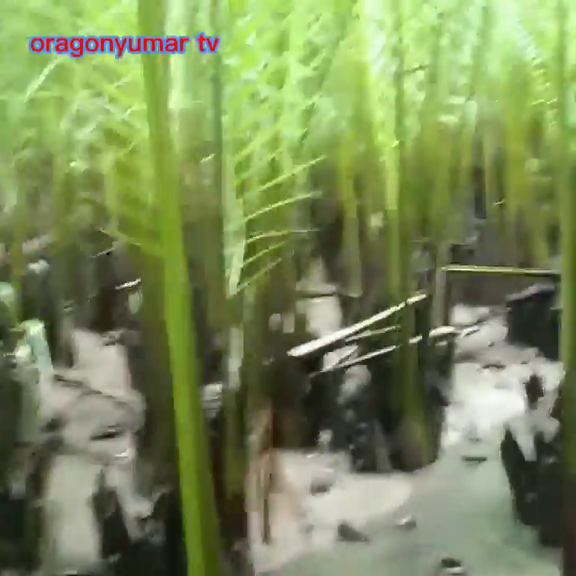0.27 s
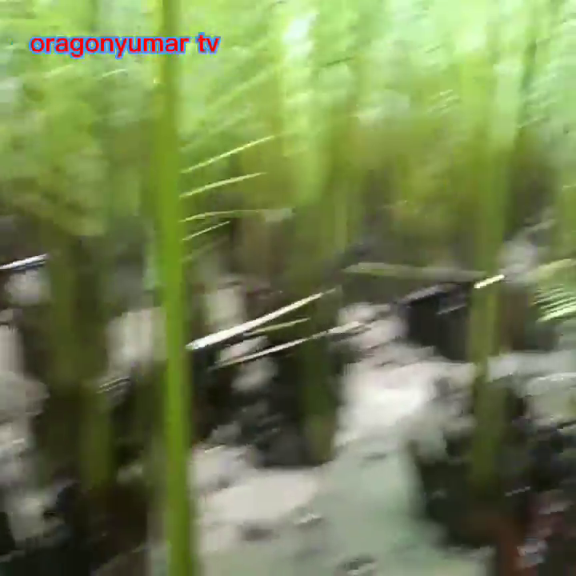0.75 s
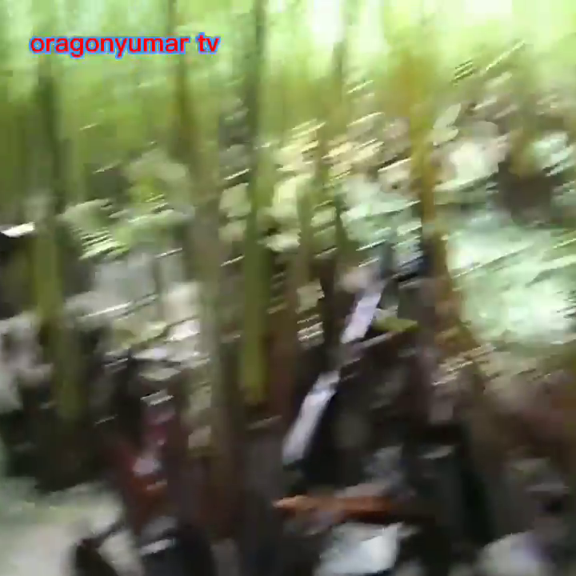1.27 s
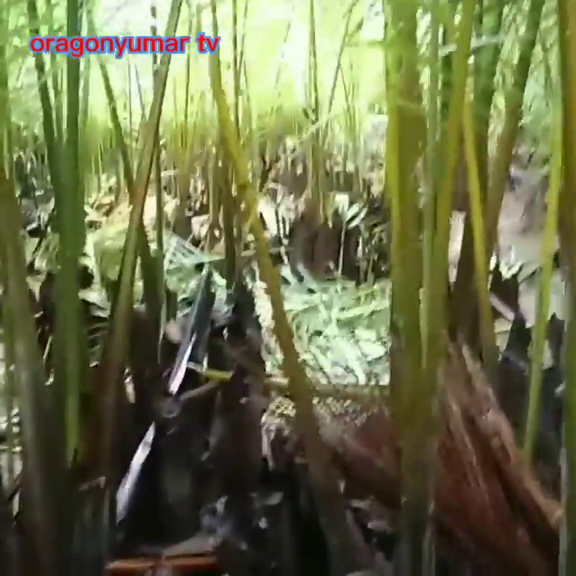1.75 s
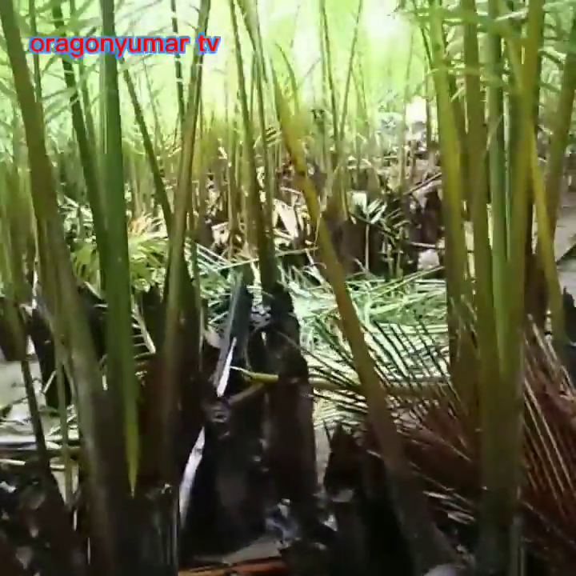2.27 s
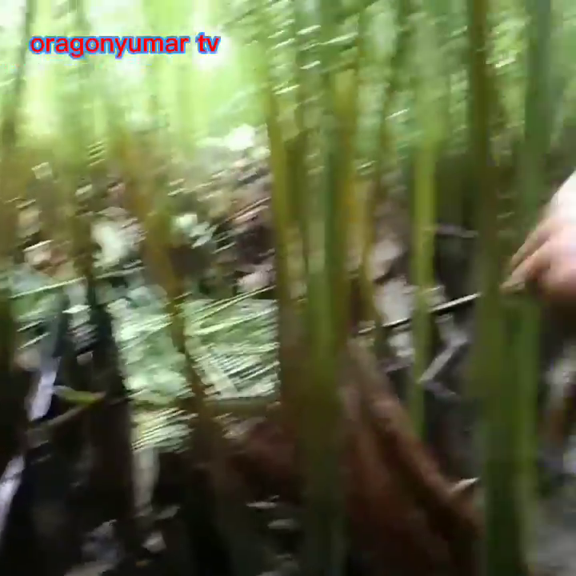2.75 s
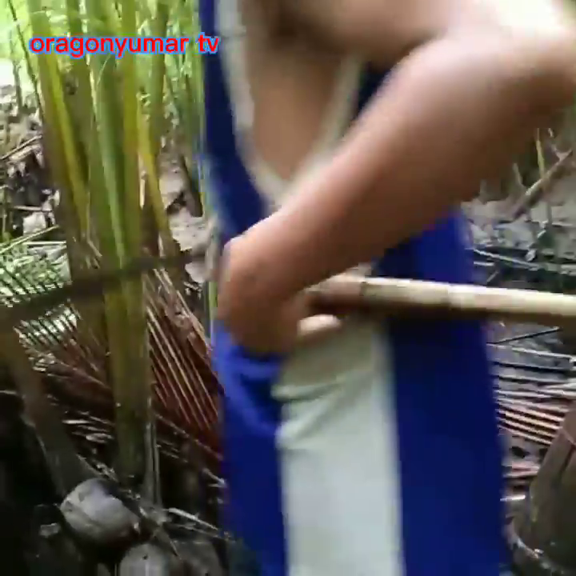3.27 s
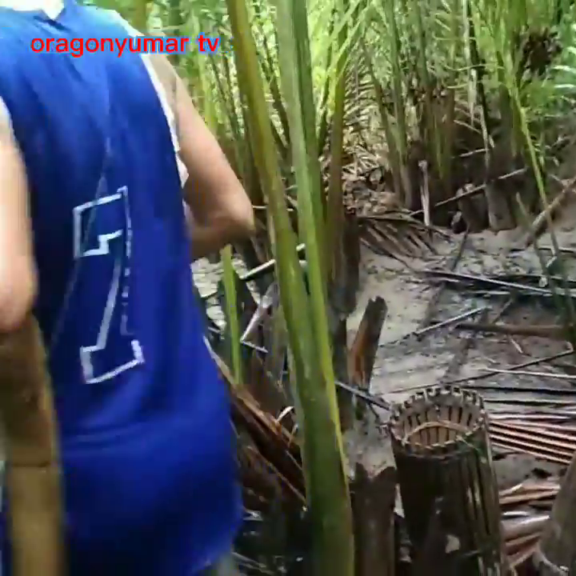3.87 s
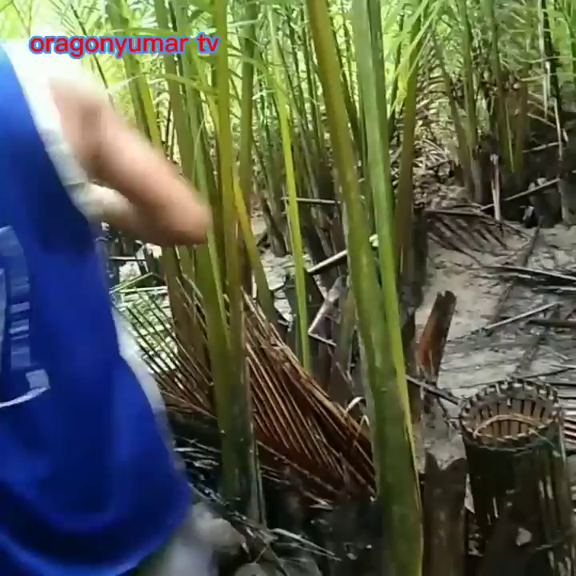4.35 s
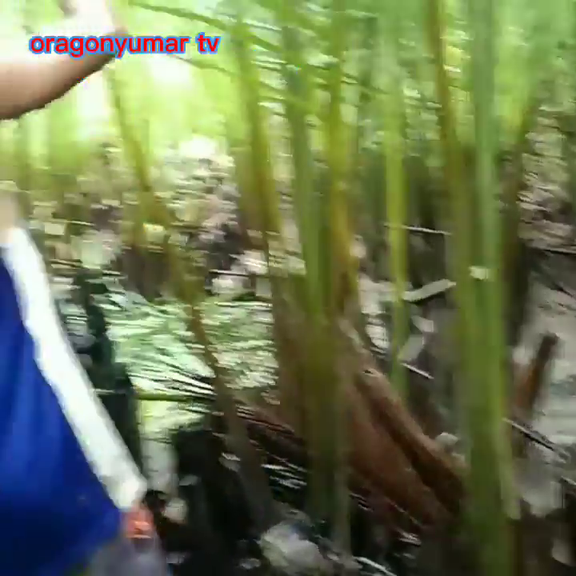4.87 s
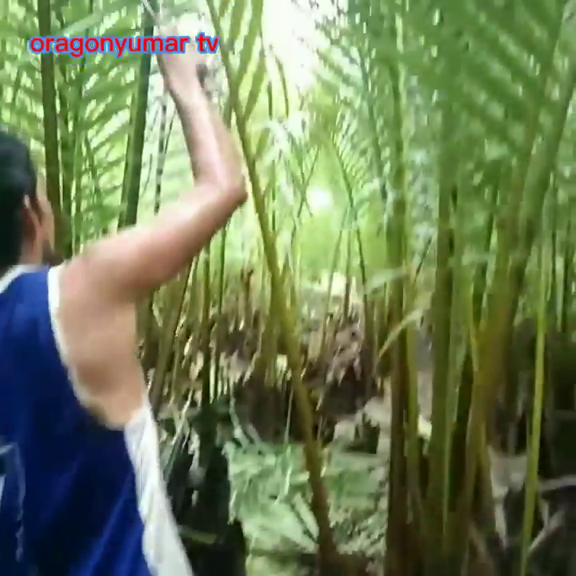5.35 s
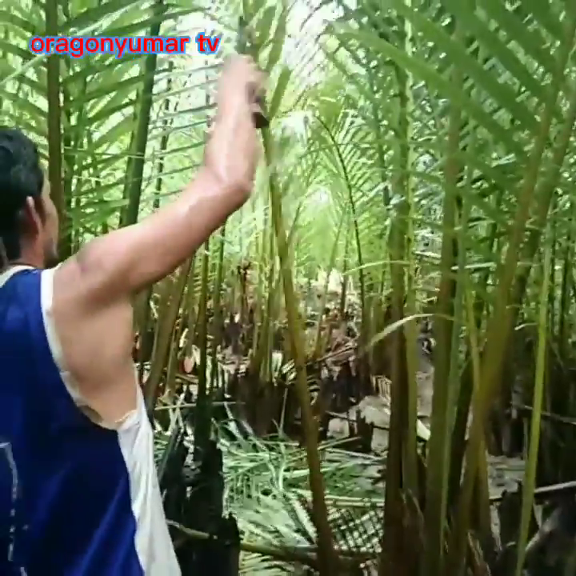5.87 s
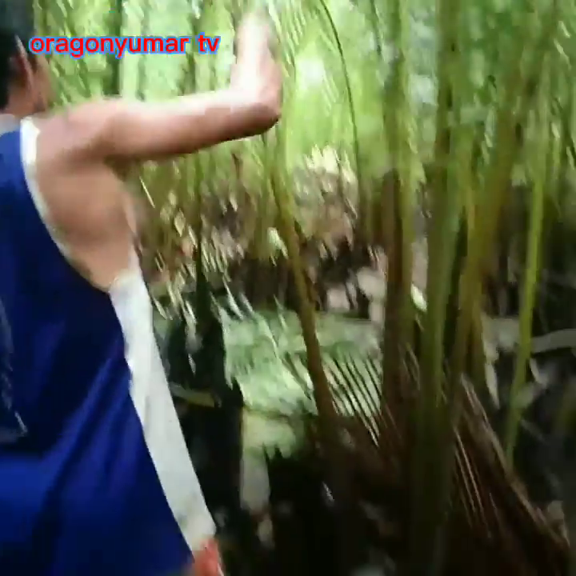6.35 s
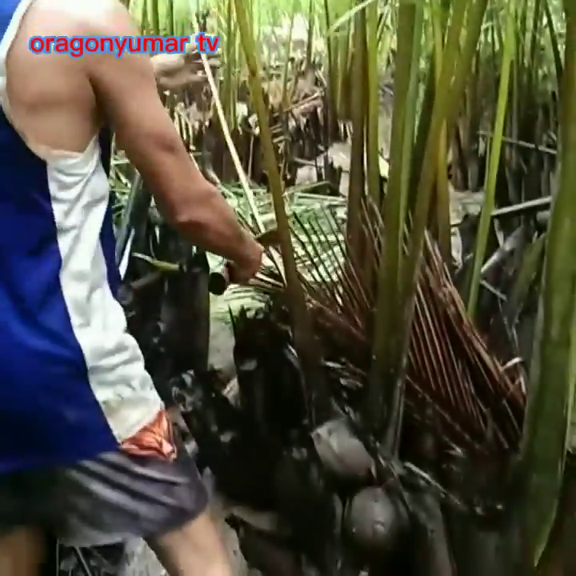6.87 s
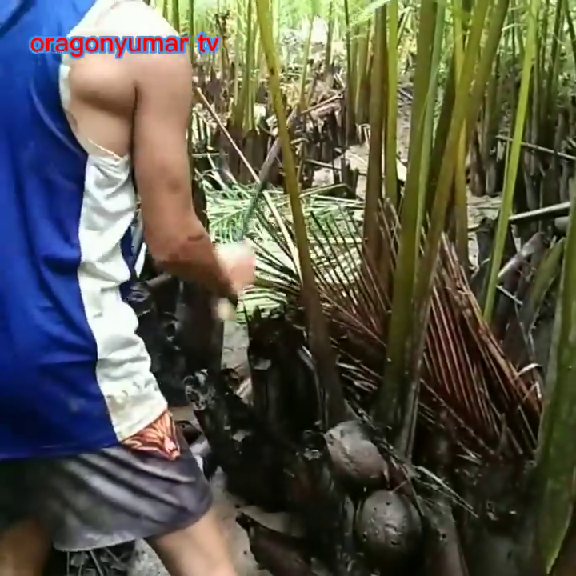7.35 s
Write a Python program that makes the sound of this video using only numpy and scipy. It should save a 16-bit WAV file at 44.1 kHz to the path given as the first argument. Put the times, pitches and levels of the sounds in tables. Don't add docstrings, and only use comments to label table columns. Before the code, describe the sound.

Dry palm fronds rustle, crackle and snap in irregular bursts, with a brief squeaky hand slide and the loudest, harshest pulls near the end.

```python
import sys
import numpy as np
from scipy import signal
from scipy.io import wavfile
from scipy.ndimage import uniform_filter1d

SR = 44100
rng = np.random.default_rng(int(sys.argv[2]) if len(sys.argv) > 2 else 0)


def invert_db(level):
    return 10 ** (np.asarray(level, dtype=float) / 20)


def int16_out(signal):
    q = np.round(np.clip(np.atleast_2d(signal).T, -1, 1) * 32767)
    wavfile.write(sys.argv[1], SR, q.astype(np.int16))


N = 335601


def rms_one(x):
    return x / np.sqrt(np.mean(x ** 2) + 1e-20)


def in_time(rows):
    s, *columns = np.transpose(rows)
    return [np.interp(np.arange(N) / SR, s, column) for column in columns]


def at_hz(points, hz):
    point_hz, point_db = np.transpose(points)
    return np.interp(np.log(hz), np.log(point_hz), point_db)


def drift(rate_hz):
    step = 40
    r = np.exp(-2 * step * np.pi * rate_hz / SR)
    white = rng.standard_normal(N // step + 2002)
    slow = signal.lfilter([1], [1, -2 * r, r * r], white)[2000:]
    return np.interp(np.arange(N) / step, np.arange(len(slow)), rms_one(slow))


def filtered(x, order, hz, kind):
    return signal.sosfilt(signal.butter(order, hz, kind, fs=SR, output="sos"), x)


def resonate(x, hz, width_hz):
    r = np.exp(-np.pi * width_hz / SR)
    poles = [1, -2 * r * np.cos(2 * np.pi * hz / SR), r * r]
    return signal.lfilter([(1 - r * r) / 2, 0, (r * r - 1) / 2], poles, x)


def add(out, at, sound):
    out[at:at + len(sound)] += sound[:N - at]


# (time [s], level [dB])
RUMBLE_GUSTS = [
    (0, -56),
    (.5, -52.5),
    (1.2, -57),
    (2.5, -51.5),
    (4.0, -54),
    (4.8, -51.5),
    (5.3, -54),
    (7.3, -51),
    (7.61, -42),
]


def rumble():
    low = filtered(rng.standard_normal(N), 2, [65, 160], "band")
    lumpy = rms_one(low * invert_db(0.89 * drift(6)))
    return invert_db(in_time(RUMBLE_GUSTS)[0] - 1.0) * lumpy


# (frequency [Hz], density [dB per Hz])
FOLIAGE_SPECTRUM = [(120, -41), (200, -4), (631, -4), (1240, -2.5), (2460, 4), (3270, -2.5), (4170, -1),
                    (4920, -0.5), (6460, -9.5), (6860, -1), (7400, -24), (9620, -42.5), (16300, -120)]


def foliage():
    level_db = -38
    together = drift(3)
    edges_hz = 180 * 2 ** np.arange(0, 5.7, 1 / 3)
    white = rng.standard_normal((2, N))
    out = 0
    for k, (low_hz, high_hz) in enumerate(zip(edges_hz, edges_hz[1:])):
        band = filtered(white[k % 2], 2, [low_hz, high_hz], "band")
        band_db = at_hz(FOLIAGE_SPECTRUM, np.sqrt(low_hz * high_hz))
        out = out + band * invert_db(band_db + 1.0 * together + 0.6 * drift(8))
    return invert_db(level_db) * rms_one(out)


def blow(out, s, db, hz, t60_s, cycles, crack_db, crack_hz, tail_db):
    t = np.arange(6000) / SR
    force = rng.standard_normal(len(t)) * invert_db(tail_db - 60 * t / np.clip(t60_s, .004, .2))
    force[0] = 1
    broad = filtered(force, 2, crack_hz, "band")
    sound = rms_one(resonate(force, hz, hz / cycles)) + invert_db(crack_db) * rms_one(broad)
    add(out, round(s * SR), invert_db(db) * sound / np.abs(sound).max())


# (time [s], peak level [dB], pitch [Hz])
STEM_KNOCKS = [(0.551, -30, 710), (1.287, -22.5, 840), (1.755, -24.5, 1190), (1.972, -29, 935),
               (2.556, -19, 1050), (2.597, -21.5, 1440), (2.761, -24.5, 1000), (2.799, -30, 950),
               (5.213, -29.5, 883), (5.839, -16, 357), (5.964, -28.5, 360), (6.676, -30, 358),
               (6.783, -30.5, 374), (6.848, -22, 300), (7.493, -16, 337)]
# (time [s], peak level [dB], pitch [Hz])
MUD_THUMPS = [
    (2.301, -25.5, 283),
    (2.91, -29.5, 294),
    (2.995, -35, 263),
    (3.39, -35, 235),
    (4.988, -33, 75.4),
    (5.458, -52, 78.1),
    (5.847, -30, 93),
]


def knocks():
    out = np.zeros(N)
    for rows, t60_s in ((STEM_KNOCKS, 0.057), (MUD_THUMPS, 0.085)):
        for s, db, hz in rows:
            blow(out, s, db, hz, t60_s, cycles=3.7, crack_db=-11.5, crack_hz=[2.0 * hz, 2.1 * hz], tail_db=-8)
    return filtered(out, 2, 2200, "low")


# (time [s], peak level [dB], pitch [Hz])
TIP_TICKS = [(0.2327, -6, 6220), (0.464, -14, 5860), (0.608, -11.5, 5880), (0.6549, -4.5, 6120),
             (0.853, -10.5, 6460), (1.007, -9, 6660), (1.035, -6, 5960), (1.0404, -8, 5960),
             (1.1187, -9, 6500), (1.2879, 3, 6960), (2.1248, -11, 6880), (2.1348, -11, 6200),
             (2.1665, 1.5, 6800), (2.2544, -15, 6060), (4.9066, -6.5, 6250), (6.2728, -8, 5900),
             (6.298, -10.5, 6350), (6.4623, -3, 6650), (6.5677, -5.5, 5870), (6.8128, -13, 5860)]
# (time [s], peak level [dB], pitch [Hz], broad crack share [dB])
RIB_SNAPS = [(0.037, -10, 3830, -9), (0.0694, -16, 3800, -9), (0.3144, -13, 4180, 3),
             (0.4164, -11.5, 2920, 5.5), (0.6536, -13, 3720, -6), (0.9674, 10, 3110, -9.5),
             (0.9789, -7.5, 3000, 11), (0.9872, -8.5, 2970, 1), (1.159, -14.5, 3600, 0),
             (2.3542, -11, 2840, 5), (2.591, -14, 3180, 11.5), (2.748, -7, 3520, 7),
             (2.878, -14.5, 1790, -6), (3.085, -17.5, 2430, -8), (3.2877, -20, 2560, -15.5),
             (3.3283, -9.5, 4300, -5), (4.43, -8.5, 4050, 1.5), (4.9043, -14.5, 3840, 0),
             (6.7486, -5, 3950, -18), (6.7797, -4.5, 4740, -17), (7.0759, -14, 2530, 6),
             (7.412, -17.5, 4300, -12), (7.491, -2.5, 2340, -17)]
# (time [s], peak level [dB], pitch [Hz], t60 [s])
LEAFLET_CRACKS = [(1.2948, -16, 6470, 0.1), (1.8659, -9, 2870, 0.099), (1.8734, -1, 6240, 0.055),
                  (2.166, 1, 3840, 0.017), (2.424, -5, 2700, 0.2), (2.4897, -8, 2450, 0.044),
                  (2.609, -9.5, 3120, 0.081), (2.7638, -12, 2030, 0.065), (3.3459, -13.5, 7000, 0.082),
                  (3.3998, -9, 5670, 0.051), (4.2085, -8.5, 2550, 0.14), (4.238, -4, 3340, 0.088),
                  (4.2844, -8.5, 4070, 0.13), (4.644, -8, 5800, 0.11), (4.7693, -19, 5440, 0.11),
                  (5.224, -17, 6060, 0.23), (5.828, -9.5, 6500, 0.14), (5.953, -10, 6800, 0.23),
                  (6.6194, -3, 3040, 0.041), (6.6728, -6.5, 5750, 0.11), (6.8438, -4.5, 5340, 0.18),
                  (6.8971, -4, 4940, 0.15), (7.4884, 4, 4440, 0.061)]


def snaps():
    out = np.zeros(N)
    for s, db, hz in TIP_TICKS:
        blow(out, s, db + 1.0, hz, .031, cycles=1.5, crack_db=-15.5, crack_hz=[1500, 6800], tail_db=-24.5)
    for s, db, hz, crack_db in RIB_SNAPS:
        t60_s = 0.033 * invert_db(-1.5 * max(db, 0))
        blow(out, s, db - 2.0, hz, t60_s, cycles=13.0, crack_db=crack_db, crack_hz=[1500, 6800], tail_db=-16.5)
    for s, db, hz, t60_s in LEAFLET_CRACKS:
        blow(out, s, db - 2.0, hz, t60_s, cycles=15.0, crack_db=0.5, crack_hz=[2200, 6900], tail_db=-7)
    return filtered(out, 2, 1100, "high")


def squeak(rows):
    hz, db = in_time(rows)
    hz = uniform_filter1d(hz, size=500)
    t = np.arange(N) / SR
    gate = np.clip(np.minimum(t - rows[0][0], rows[-1][0] - t) / .012, 0, 1)
    turns = np.cumsum(hz * (1 + 0.0111 * drift(270))) / SR
    roughness = .85 + 0.5 * drift(180)
    return gate * invert_db(db) * roughness * np.sin(2 * np.pi * turns)


# (time [s], pitch [Hz], level [dB])
STALK_CREAK = [
    (0.201, 2490, -46),
    (.27, 2170, -36),
    (.325, 2050, -36),
]
# (time [s], pitch [Hz], level [dB])
HAND_SQUEAK = [
    (4.86, 2680, -54),
    (4.89, 3140, -44),
    (4.91, 3610, -33),
    (4.95, 3770, -32.5),
    (4.98, 4450, -23),
    (5.003, 5250, -32),
    (5.045, 5300, -37),
    (5.075, 5460, -50),
]
# (time [s], pitch [Hz], level [dB])
WAX_CHIRPS = [
    [(4.975, 4650, -41), (4.997, 4220, -23), (5.02, 4100, -45), (5.05, 4360, -45)],
    [(7.36, 5300, -48), (7.375, 5340, -29), (7.44, 5270, -36)],
]


def squeaks():
    return sum(squeak(rows) for rows in [HAND_SQUEAK, STALK_CREAK] + WAX_CHIRPS)


def swells(rows):
    s, db, rise_s, fall_s = np.transpose(rows)[:4, :, None]
    t = np.arange(0, N + 64, 64) / SR
    away = np.maximum((s - t) / rise_s, (t - s) / fall_s)
    return t, invert_db(db - 20 * away ** 1.126) ** 2


# (time [s], level [dB])
RESTLESS_STIR = [
    (0, -39.5),
    (.8, -38),
    (1.4, -39),
    (2.0, -36.5),
    (3.6, -36.5),
    (4.15, -41),
    (4.5, -36.5),
    (5.7, -41.5),
    (6.1, -37.5),
    (7.61, -37.5),
]
# (peak time [s], level [dB], rise [s], fall [s], blades against tips [dB])
LEAFLET_STROKES = [(.3, -33, 0.39, 0.47, -7), (.97, -22.5, 0.018, 0.043, -1.5),
                   (1.879, -24.5, 0.066, .05, -9), (1.971, -33.5, 0.12, 0.23, -9),
                   (2.162, -26.5, 0.03, 0.035, -12), (2.27, -29.5, 0.059, .14, -5),
                   (2.35, -20, 0.092, 0.09, 3.5), (2.428, -24, 0.084, .1, -3),
                   (2.512, -21.5, 0.12, 0.083, -3), (2.78, -33.5, 0.12, 0.064, 4),
                   (3.39, -23.5, 0.067, 0.057, -3.5), (4.24, -22.5, 0.052, 0.082, -6),
                   (4.376, -26.5, 0.023, .07, -6), (4.662, -26, 0.032, .09, -19),
                   (5.836, -28.5, 0.0095, 0.079, -4), (5.967, -22.5, 0.13, 0.17, -15),
                   (6.34, -13, .06, 0.13, -12), (6.43, -9, 0.12, 0.14, -18), (6.57, -7, .25, 0.13, -16),
                   (6.62, -23.5, 0.072, 0.051, -3), (6.85, -15.5, 0.082, 0.1, -14),
                   (6.918, -22.5, 0.08, 0.14, -12.5), (7.499, -11.5, 0.016, 0.05, -6.5),
                   (7.568, -21.5, .1, 0.06, -4)]
# (peak time [s], level [dB], rise [s], fall [s], pitch [Hz])
STALK_BENDS = [(.37, -46.5, 0.15, 0.37, 1260), (1.879, -38.5, 0.046, 0.09, 1284),
               (2.286, -24, 0.045, 0.2, 1385), (2.348, -23.5, .08, 0.049, 1306),
               (2.43, -30, 0.037, .07, 1490), (2.5, -30.5, 0.046, 0.083, 1570),
               (2.779, -38, 0.12, 0.16, 1093), (3.429, -39, .1, 0.055, 1404), (4.24, -45, 0.18, .2, 1440),
               (4.659, -45.5, .1, 0.046, 1070), (5.836, -27, 0.015, .05, 785),
               (5.97, -39, 0.045, 0.17, 644), (6.4, -32.5, .15, 0.24, 927), (6.52, -29, 0.28, 0.18, 662),
               (6.62, -30.5, 0.13, .04, 780), (6.88, -33, 0.082, 0.08, 607), (7.0, -40.5, .05, 0.04, 1470),
               (7.494, -23.5, 0.025, 0.049, 800)]
# (peak time [s], level [dB], rise [s], fall [s])
EDGE_WHISKS = [
    (3.43, -31.5, .06, 0.07),
    (6.45, -36, .15, .1),
    (6.56, -18, .1, 0.2),
    (6.85, -14.5, .05, 0.11),
    (6.91, -23, .06, 0.038),
]


def contact():
    t, strokes = swells(LEAFLET_STROKES)
    _, bends = swells(STALK_BENDS)
    _, whisks = swells(EDGE_WHISKS)
    weight_db = np.array(LEAFLET_STROKES)[:, 4]
    bend_hz = np.array(STALK_BENDS)[:, 4]
    rest_hz = 1000
    stir = invert_db(np.interp(t, *np.transpose(RESTLESS_STIR))) ** 2
    tips = stir + strokes.sum(axis=0)
    edge_share = invert_db(-1.5 + 0.38 * weight_db) ** 2
    edges = stir * invert_db(-4.5) ** 2 + edge_share @ strokes + whisks.sum(axis=0)
    blades = stir * invert_db(-5.5) ** 2 + invert_db(weight_db) ** 2 @ strokes
    resting = stir * invert_db(-14.5) ** 2
    stalks = resting + bends.sum(axis=0)
    stalk_hz = (resting * rest_hz + bend_hz @ bends) / stalks
    levels_db = 10 * np.log10([tips, edges, blades, stalks])
    return np.c_[t, levels_db.T, stalk_hz]


def grains(low_hz, high_hz, colour_db, per_s, spread_db, cycles, count):
    sizes = invert_db(spread_db * np.minimum(rng.exponential(1, N), 4)) * rng.choice([-1, 1], N)
    born = rng.random(N) < per_s * invert_db(1.5 * drift(60)) / SR
    dealt = rng.integers(0, count, N)
    out, power = 0, 0
    for k, hz in enumerate(np.geomspace(low_hz, high_hz, count)):
        hits = sizes * born * (dealt == k) + 1e-18
        rung = resonate(resonate(hits, hz, hz / cycles), hz, 2 * hz / cycles)
        flicker_db = 2.87 * drift(14)
        out = out + invert_db(colour_db(hz) + flicker_db) * rms_one(rung) * np.sqrt(hz)
        power = power + invert_db(colour_db(hz)) ** 2 * hz
    return rms_one(out / np.sqrt(power * per_s))


# (frequency [Hz], density [dB per Hz])
LEAF_SPECTRUM = [(880, -46), (1500, -5.5), (1860, -20), (2460, -4), (3300, -14), (4250, -0.5), (5090, -6),
                 (6700, 3), (7100, -15), (7400, -24.5), (9620, -44), (16300, -120)]


def rubbing():
    tips_db, edges_db, blades_db, stalks_db, stalk_hz = in_time(contact())

    def leaf(hz):
        return at_hz(LEAF_SPECTRUM, hz)

    def blade(hz):
        return -16.0 * np.log2(hz / 2660) ** 2

    def stalk(hz):
        return -9.0 * ((hz - stalk_hz) / 700) ** 2

    busy = invert_db(.22 * (tips_db + 29))
    tips = grains(5425, 7150, leaf, per_s=5500 * busy, spread_db=-0.5, cycles=10.3, count=7)
    edges = grains(3665, 4804, leaf, per_s=4000 * busy, spread_db=2.5, cycles=9.5, count=6)
    blades = grains(1786, 3246, blade, per_s=3200 * busy, spread_db=2.5, cycles=8.9, count=8)
    stalks = grains(262.0, 1726, stalk, per_s=2600 * busy, spread_db=4.0, cycles=7.8, count=12)
    leaves = invert_db(tips_db) * tips + invert_db(edges_db) * edges + invert_db(blades_db) * blades
    catching = invert_db(0.81 * drift(46))
    return catching * (leaves + invert_db(stalks_db) * stalks)


def scene():
    far = rumble() + foliage()
    near = knocks() + snaps() + squeaks() + rubbing()
    for lag_s, echo_db in ((.009, -16.5), (.021, -24)):
        near = near + invert_db(echo_db) * np.pad(near, (round(lag_s * SR), 0))[:N]
    return (far + near)[None]


def low_pass(x):
    return signal.sosfilt(signal.butter(12, 15600, fs=SR, output="sos"), x)


def record(dry):
    band_top_hz, splash_top_hz = 7138, 15600
    rounded = 1.095 * np.tanh(dry / 1.135)
    cut = signal.sosfilt(signal.cheby1(10, .5, band_top_hz, fs=SR, output="sos"), rounded)
    clipped = np.clip(cut, -.97, .97)
    splashed = signal.sosfilt(signal.cheby2(8, 50, splash_top_hz, fs=SR, output="sos"), clipped)
    hiss = filtered(rng.standard_normal(dry.shape), 6, 10500, "high")
    return low_pass(splashed + invert_db(-90.5) * hiss)


dry = scene()
out = record(dry)
int16_out(out)
```